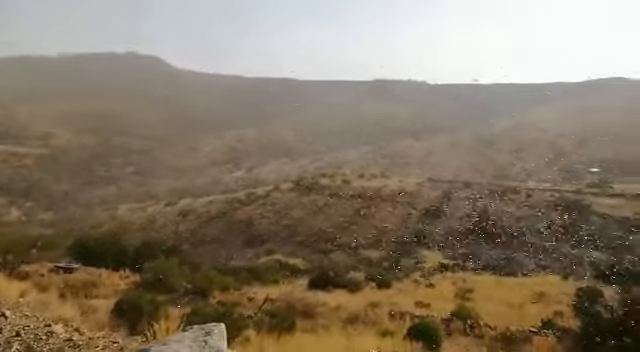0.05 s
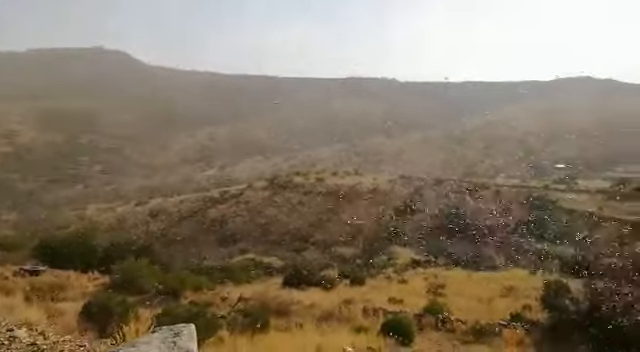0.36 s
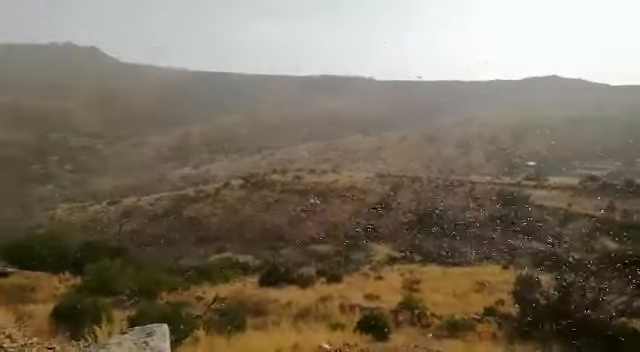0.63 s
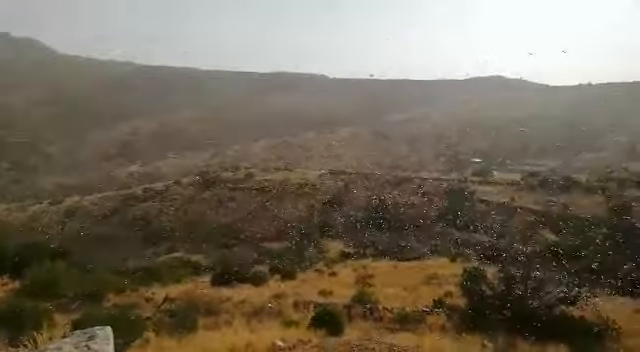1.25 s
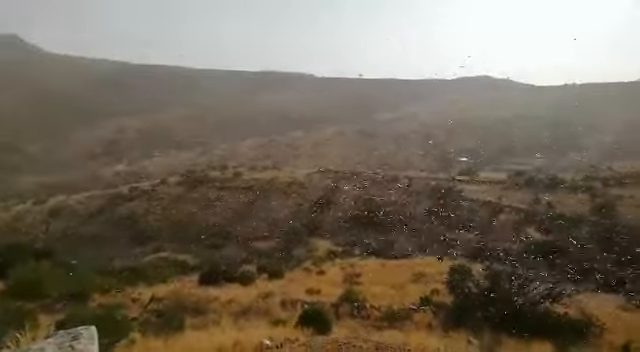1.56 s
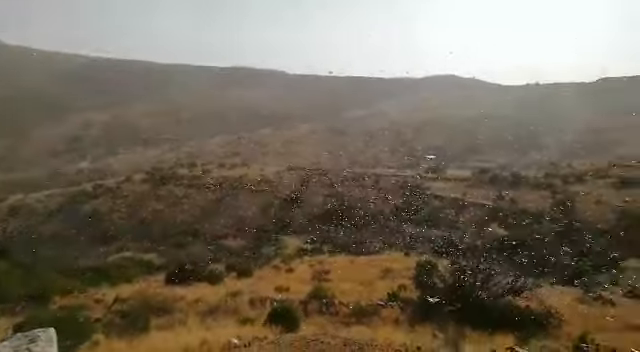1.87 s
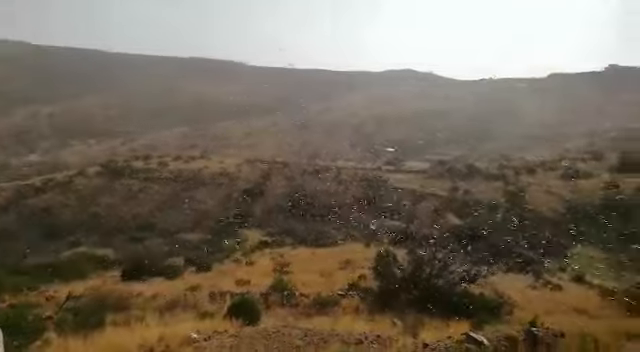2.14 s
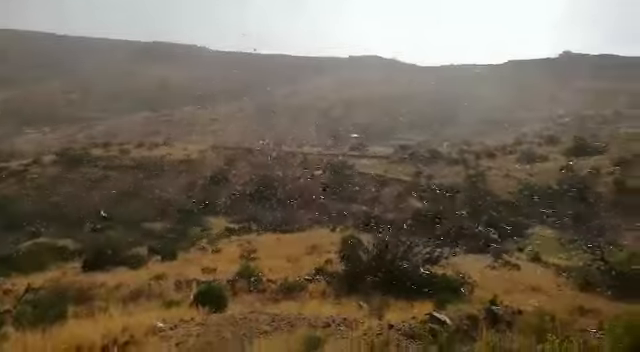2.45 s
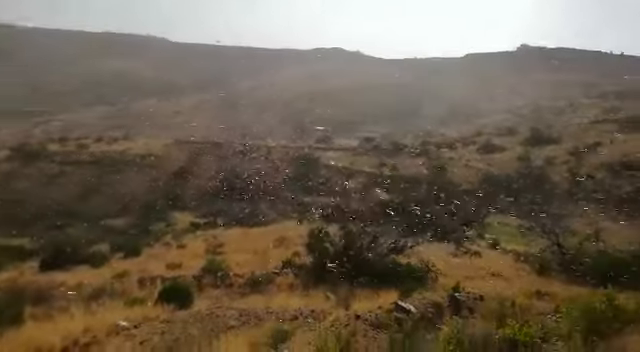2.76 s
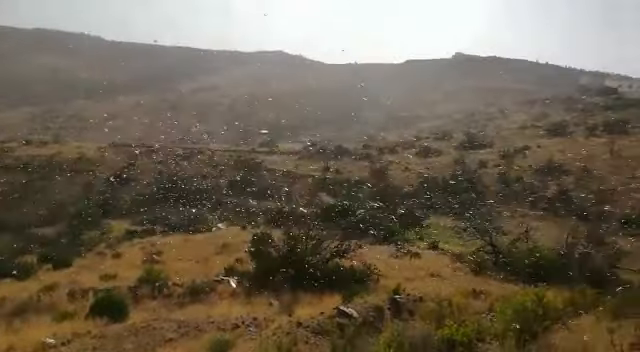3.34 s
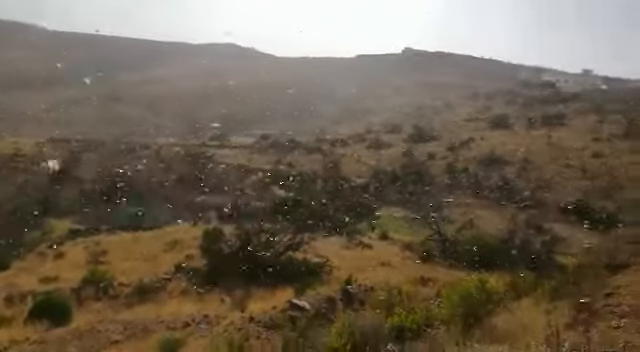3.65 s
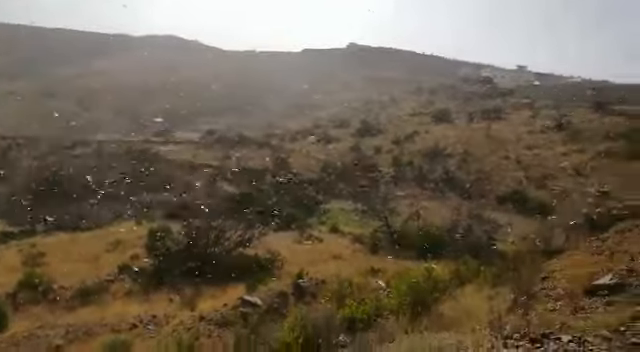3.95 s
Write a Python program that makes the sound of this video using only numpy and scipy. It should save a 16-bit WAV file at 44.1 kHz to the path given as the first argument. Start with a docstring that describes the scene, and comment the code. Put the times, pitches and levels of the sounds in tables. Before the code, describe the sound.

Countless flying locusts make a continuous, swelling hiss outdoors. A few dry ticks sound early, then wind buffets the microphone harder as single insects flutter briefly past, before the gusts ease and a few short taps follow.

```python
"""A locust swarm streams over an open hillside: from the start, countless wings merge into a surging hiss
while wind buffets the microphone of a slowly turning phone. Dry ticks come just before 1 s; then the
gusts build, and from 1.5 s a few insects pass close by, rustling with each wingbeat. A faint whine
swells on the right around 2.7 s. The wind peaks near 3.3 s, the gain control ducking under the
strongest gusts, and a few taps come at the end."""
import sys
import numpy as np
from scipy import signal
from scipy.fft import rfft, irfft, next_fast_len
from scipy.io import wavfile
from scipy.ndimage import uniform_filter1d

SR = 44100
rng = np.random.default_rng(int(sys.argv[2]) if len(sys.argv) > 2 else 0)


def waveform_to_disk(signal):
    """Save audio, clipped to [-1, 1], as 16-bit WAV at the path in sys.argv[1]."""
    frames = np.transpose(np.atleast_2d(signal))
    scaled = np.clip(frames, -1, 1) * 32767
    samples = np.round(scaled).astype(np.int16)
    wavfile.write(sys.argv[1], SR, samples)


N = 176400
T = np.arange(N) / SR
HZ = np.maximum(np.arange(N // 2 + 1) * SR / N, 1)


def amp(db):
    """Decibels to gain."""
    return np.exp(np.asarray(db) * np.log(10) / 20)


def unit(x):
    """Scale to rms 1."""
    return x / np.sqrt(np.mean(x ** 2))


def curve(rows):
    """Join (time_s, value) rows by straight lines."""
    return np.interp(T, *np.array(rows).T)


def per_hz(rows, hz, column=1):
    """Read a spectrum column on a log-frequency axis."""
    rows = np.array(rows, float)
    return np.interp(np.log(hz), np.log(rows[:, 0]), rows[:, column])


def shape(x, gain):
    """Filter by a gain per frequency."""
    return irfft(rfft(x) * gain, N)


def wobble(rate_hz):
    """Random curve, spread near 1, turning rate_hz times a second."""
    return 1.2 * np.interp(T * rate_hz, np.arange(400), rng.standard_normal(400))


def passband(freq_hz, centre_hz, width_hz):
    """Gain of a flat-topped, steep-sided band."""
    return 1 / np.sqrt(1 + (2 * (freq_hz - centre_hz) / width_hz) ** 6)


def panned(sound, level_db, pan_db):
    """Apply level and pan; pan_db is left minus right."""
    return sound * amp(level_db) * unit(amp([[pan_db / 2], [-pan_db / 2]]))


def swell(peak_s, sigma_s, centre_hz, width_hz, level_db, pan_db):
    """Noise band under a Gaussian envelope."""
    active = np.abs(T - peak_s) < 4 * sigma_s
    size = next_fast_len(int(active.sum()))
    noise = np.random.default_rng(rng.integers(1 << 30)).standard_normal((size, 2)).T
    band = passband(np.fft.rfftfreq(size, 1 / SR), centre_hz, width_hz)
    sound = unit(irfft(rfft(noise) * band, size))[:, :active.sum()]
    envelope = np.exp(-.5 * ((T[active] - peak_s) / sigma_s) ** 2)
    out = np.zeros((2, N))
    out[:, active] = panned(sound * envelope, level_db, pan_db)
    return out


def wing_spectrum(snaps_per_s=2500, spread_db=3.5, snap_db=-8.5):
    """Dense, uneven wing snaps over the smooth rush of far insects."""
    snaps = (rng.random(N) < snaps_per_s / SR) * rng.choice([-1, 1], N)
    sizes = amp(spread_db * np.minimum(rng.exponential(size=N), 5))
    rush = rng.standard_normal(N)
    return rfft(unit(rush + amp(snap_db) * unit(snaps * sizes)))


def ripple_db(depth_db=2.6, spacing_hz=70.24):
    """Narrow resonances: random spectral peaks and dips."""
    return depth_db * np.interp(HZ / spacing_hz, np.arange(1000), rng.standard_normal(1000))


# Swarm hiss spectrum: freq_hz, left_relative_db, right_relative_db
HISS_SPECTRUM = [(200, 1.5, -6), (537, -10, -5), (785, -3, -10.5), (1170, -5.5, -4.5), (1350, -11.5, -7.5),
                 (1670, -11, -2), (1990, -16.5, -7), (2450, -9.5, -3), (2540, -18, -6), (2840, -16.5, -4),
                 (3250, -13.5, -8), (4100, -18.5, -10), (4600, -17.5, -12.5), (4930, -17, -7),
                 (5050, -20, -14), (5580, -16.5, -10.5), (6100, -23.5, -17), (6900, -21, -18.5),
                 (8000, -26.5, -24), (9400, -23, -25.5), (10300, -22.5, -28.5), (12200, -34.5, -39),
                 (15500, -40.5, -39.5)]
# Left phase lead of the common hiss: freq_hz, lead_rad
HISS_LEAD = [(100, .6), (520, 1.57), (780, 3.43), (1030, 1.86), (1720, 4.14), (2580, 3), (3500, 5.2),
             (4600, 4.64), (5500, 6.4), (6630, 9.26), (15000, 20.9)]
# Left treble as the phone turns, before band weighting: time_s, gain_db
TURN_TREBLE = [(0, 2), (.5, 4.5), (1.0, 3), (1.5, -6), (2.1, 0), (2.6, -5), (3.2, -7), (3.6, -2), (4, -2)]
# Band weighting of the turn: freq_hz, weight
TURN_SHADING = [(1000, 0), (2400, 0.21), (4000, 0.77), (6500, 0.64), (9000, 0.16), (15000, 0.47)]


def swarm_hiss(level_db=-46, flicker_db=1.27, swell_db=.24, common_share=.48):
    """Merged wing noise; each band flickers, and the phone's turn shades the left treble."""
    common = wing_spectrum() * np.exp(-1j * np.outer([0, 1], per_hz(HISS_LEAD, HZ)))
    colour = amp([per_hz(HISS_SPECTRUM, HZ, column) + ripple_db() for column in (1, 2)])
    separate = np.array([wing_spectrum(), wing_spectrum()])
    hiss = (np.sqrt(common_share) * common + np.sqrt(1 - common_share) * separate) * unit(colour)
    centres_hz = np.geomspace(800, 12000, 9)
    turn_db = curve(TURN_TREBLE)
    out = np.zeros((2, N))
    for hz, weights in zip(centres_hz, np.eye(len(centres_hz))):
        band = irfft(hiss * np.interp(HZ, centres_hz, weights), N)
        band *= amp(flicker_db * wobble(rate_hz=25.15))
        out[0] += band[0] * amp(turn_db * per_hz(TURN_SHADING, hz))
        out[1] += band[1]
    return out * amp(level_db + swell_db * wobble(rate_hz=10))


# Swarm surges: peak_s, sigma_s, centre_hz, width_hz, level_db, pan_db
SWARM_SURGES = [(.25, .4, 5680, 700, -58.5, -8), (.35, 0.31, 4900, 350, -59.5, -3),
                (.35, .4, 2310, 203, -53.5, -15.5), (0.353, 0.34, 2860, 500, -52.5, -16.5),
                (0.801, 0.17, 2500, 500, -52.5, -13), (1.107, 0.37, 1840, 810, -52, -6),
                (1.147, .3, 2869, 905, -50.3, -9), (2.105, 0.21, 5060, 700, -58, -6),
                (1.9, .25, 2978, 800, -52.5, -9), (2.44, .24, 3534, 1220, -48.5, -16),
                (2.968, 0.18, 3570, 1613, -50, -18), (3.451, .2, 3900, 900.4, -56, -15),
                (3.85, .18, 2320, 450, -56, -14)]


def swarm_surges():
    """Parts of the swarm swell and fade."""
    return sum(swell(*row) for row in SWARM_SURGES)


def whine():
    """A faint, thin tone on the right."""
    return swell(peak_s=2.7, sigma_s=.23, centre_hz=11030, width_hz=8, level_db=-75, pan_db=-9)


def wing_clicks(clicks_per_s=50, level_db=-72, spread_db=2.5, centre_hz=6000, sigma_octaves=.75):
    """Sparse dry snaps of the nearest wings, scattered left and right."""
    sizes = amp(spread_db * np.minimum(rng.exponential(size=N), 3))
    snaps = sizes * (rng.random(N) < clicks_per_s / SR)
    pan_rad = rng.random(N) * np.pi / 2
    stereo = snaps * np.array([np.cos(pan_rad), np.sin(pan_rad)])
    band = np.exp(-.5 * (np.log2(HZ / centre_hz) / sigma_octaves) ** 2)
    return unit(shape(stereo, band)) * amp(level_db)


# Close passes: peak_s, sigma_s, centre_hz, width_hz, level_db, pan_db
CLOSE_PASSES = [(1.469, 0.015, 9400, 2408, -63, 6), (2.177, 0.017, 9330, 2803, -63, -5),
                (2.564, 0.028, 7040, 4000, -61, -2), (2.631, 0.032, 9800, 2398, -63, 4.5),
                (3.053, .04, 9000, 2994, -65, 1), (3.978, 0.013, 9103, 2000, -58, 4)]


def close_locusts(wingbeat_hz=58, depth_db=7):
    """Single insects rustle past, one burst per wingbeat."""
    out = np.zeros((2, N))
    for peak_s, *settings in CLOSE_PASSES:
        beats = amp(depth_db * np.cos(2 * np.pi * wingbeat_hz * (T - peak_s)))
        out += swell(peak_s, *settings) * unit(beats)
    return out


# Ticks and taps near the phone: start_s, decay_s, centre_hz, width_hz, peak_db, pan_db
DRY_TAPS = [(.837, 0.0027, 5000, 2750, -38, -14), (0.851, 0.0012, 4630, 2780, -34, -10),
            (.951, 0.0014, 4150, 2000, -37, -15), (3.6836, .0004, 11000, 2600, -38, 12),
            (3.976, 0.0022, 1260, 1009, -42.5, 3), (3.979, 0.0036, 1690, 1410, -32.5, 5)]


def taps():
    """Dry contacts: instant onset, gone within milliseconds."""
    out = np.zeros((2, N))
    for start_s, decay_s, centre_hz, width_hz, peak_db, pan_db in DRY_TAPS:
        envelope = (T >= start_s) * np.exp(-np.clip((T - start_s) / decay_s, 0, 20))
        burst = shape(rng.standard_normal(N) * envelope, passband(HZ, centre_hz, width_hz))
        out += panned(burst / np.abs(burst).max(), peak_db, pan_db)
    return out


# Eddy pressure spectrum at drift speed 1: freq_hz, relative_db
EDDY_SPECTRUM = [(12, -15), (30, -7.5), (75, 1.5), (120, -0.6), (200, -4.5), (300, -12.5), (450, -22),
                 (700, -40), (1200, -67), (3000, -83)]


def eddies():
    """Pressure pattern frozen into the moving air, of even strength."""
    air = shape(rng.standard_normal(N), amp(per_hz(EDDY_SPECTRUM, HZ)))
    return air / np.sqrt(uniform_filter1d(air ** 2, size=1100, mode="wrap"))


# Gust strength at the microphone: time_s, strength_db
GUSTS = [(0, -27.5), (.04, -34.5), (.08, -29), (.11, -27.5), (.13, -33), (.34, -30.5), (.4, -37.5),
         (.48, -31), (.6, -31), (.63, -37), (.71, -29), (.87, -38), (.98, -27), (1.03, -34.5),
         (1.16, -23.5), (1.21, -29), (1.24, -20.5), (1.39, -23.5), (1.42, -30), (1.45, -24.5),
         (1.52, -29.5), (1.55, -20), (1.59, -22), (1.62, -30), (1.66, -26.5), (1.72, -34.5), (1.84, -25.5),
         (1.87, -37.5), (1.92, -28), (1.95, -37.5), (2.08, -39.5), (2.18, -29), (2.21, -20.5),
         (2.25, -22.5), (2.33, -21), (2.37, -31), (2.4, -21), (2.5, -21), (2.64, -20.5), (2.74, -26),
         (2.79, -22), (2.89, -21.5), (2.93, -29.5), (3.0, -23), (3.03, -29), (3.14, -19.5), (3.17, -25),
         (3.2, -20.5), (3.28, -26), (3.31, -16), (3.34, -22.5), (3.42, -18), (3.45, -27), (3.52, -25),
         (3.6, -20), (3.7, -24), (3.8, -34), (3.89, -30.5), (3.92, -37), (3.96, -25.5), (4, -27)]
# Sudden buffets on the gusts: peak_s, half_width_s, strength_db
WIND_BUFFETS = [(0.087, .014, 9), (0.574, 0.0079, 6.5), (0.599, 0.0062, 10), (0.968, 0.0093, 6.5),
                (1.373, .03, 2.5), (1.565, .025, 2), (1.837, 0.0074, 8.5), (2.157, 0.0065, 6.5),
                (2.285, 0.0073, 5), (2.33, .007, 6.5), (2.901, 0.0086, 3.5), (3.105, 0.0053, 10),
                (3.142, 0.0058, 8.5), (3.218, 0.0066, 8), (3.248, 0.0083, 5), (3.361, 0.00675, 6.5),
                (3.396, 0.00506, 7.5), (3.496, 0.0032, 6.5), (3.663, 0.00394, 8), (3.679, 0.0068, 8),
                (3.702, 0.0074, 8.5)]
# Base drift of the eddies: time_s, speed_ratio
EDDY_DRIFT = [(0, .85), (.08, 1.27), (.14, 0.84), (.3, .95), (.58, 1.1), (.72, .8), (.9, 0.9), (1.2, .8),
              (1.36, .88), (1.47, .8), (1.65, 1.12), (1.82, 1.31), (1.92, .85), (2.18, .85), (2.3, 1.107),
              (2.41, .95), (2.52, 1.15), (2.63, .95), (2.88, 1.15), (2.99, .82), (3.06, 1.25), (3.22, 1.12),
              (3.32, .88), (3.55, 1.0), (3.69, 1.247), (3.75, .88), (4, 1.0)]
# Duller wind on the right: freq_hz, gain_db
RIGHT_RESPONSE = [(30, 1), (120, 0), (200, -3.4), (300, -2), (550, -9), (900, -3.5)]


def wind(gain_db=1.93, reference_db=-25, core_s=.0012, core_db=6, right_only_db=-10.5, lag_s=.00086):
    """Eddies cross the microphone port: stronger gusts carry them faster, so louder and brighter."""
    buffet_db, cores = np.zeros((2, N))
    for peak_s, half_width_s, strength_db in WIND_BUFFETS:
        buffet_db += strength_db * np.exp(-np.minimum(((T - peak_s) / half_width_s) ** 2, 20))
        offset = (T - peak_s) / core_s
        cores += offset * np.exp(-np.minimum(offset ** 2 / 2, 20))  # one pressure swing: a thump
    gust_db = curve(GUSTS) + 1.26 * wobble(rate_hz=45)
    speed_db = .1615 * (gust_db - reference_db) + .34 * buffet_db + .96 * wobble(rate_hz=70)
    position = np.cumsum(curve(EDDY_DRIFT) * amp(speed_db)) % N
    force = amp(gust_db + .5 * buffet_db + gain_db)
    common, right_only = (np.interp(position, np.arange(N), eddies()) * force for _ in range(2))
    left = common + amp(core_db) * cores * force
    dull_and_late = amp(per_hz(RIGHT_RESPONSE, HZ)) * np.exp(-2j * np.pi * HZ * lag_s)
    right = shape(left + amp(right_only_db) * right_only, dull_and_late)
    return np.array([left, right])


def scene():
    """Close insects, taps and wind over the swarm, in stereo."""
    return close_locusts() + taps() + wind() + swarm_hiss() + wing_clicks() + swarm_surges() + whine()


def record(dry):
    """Gain control ducks under strong buffets and recovers slowly; a low-pass cuts the top."""
    threshold_db, duck_db_per_db, release_s, cutoff_hz = -12, .33, .5, 15740
    release = np.exp(-T / release_s)
    held_peak = np.maximum.accumulate(np.abs(dry).max(axis=0) / release) * release
    envelope = uniform_filter1d(held_peak, size=300)
    gain = np.maximum(envelope / amp(threshold_db), 1) ** -duck_db_per_db
    lowpass = signal.ellip(10, .1, 80, cutoff_hz, fs=SR, output="sos")
    return signal.sosfilt(lowpass, dry * gain)


dry = scene()
out = record(dry)
waveform_to_disk(out)
```